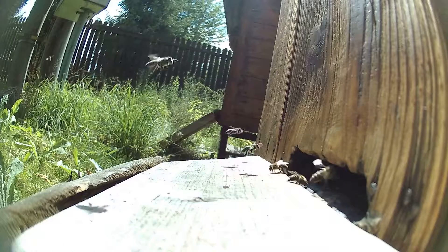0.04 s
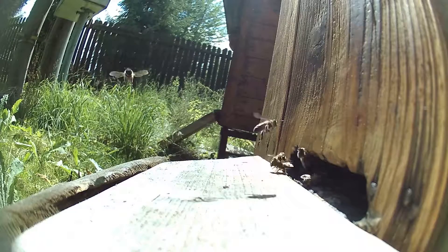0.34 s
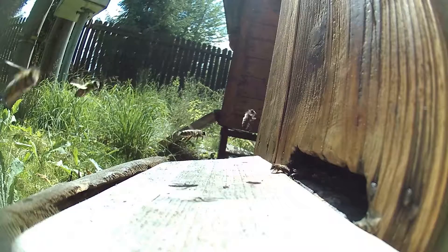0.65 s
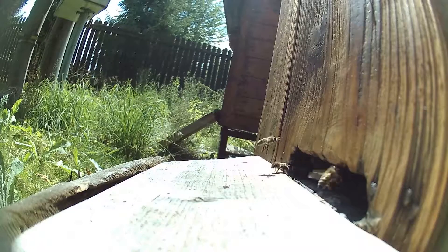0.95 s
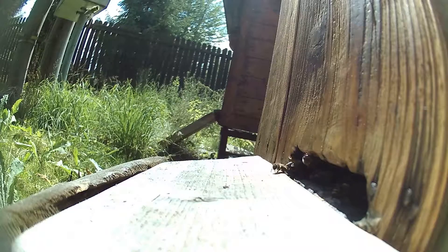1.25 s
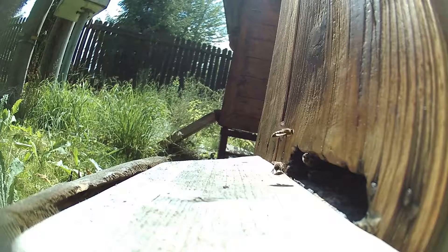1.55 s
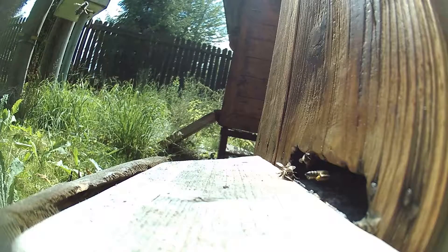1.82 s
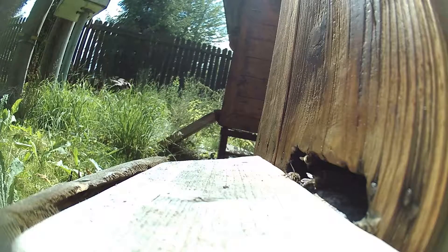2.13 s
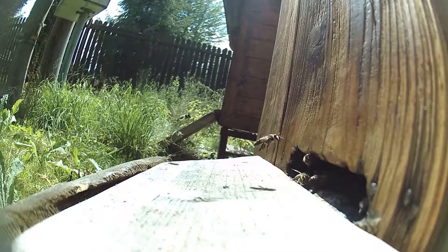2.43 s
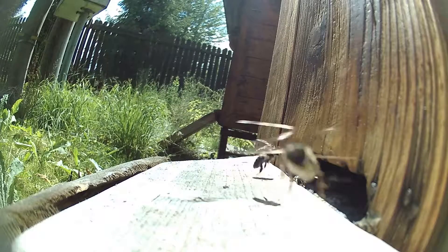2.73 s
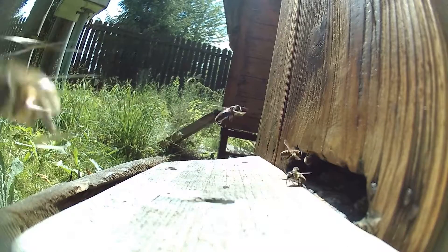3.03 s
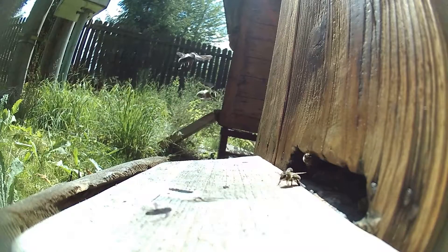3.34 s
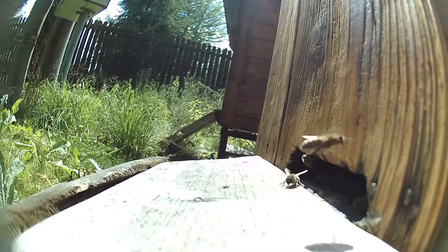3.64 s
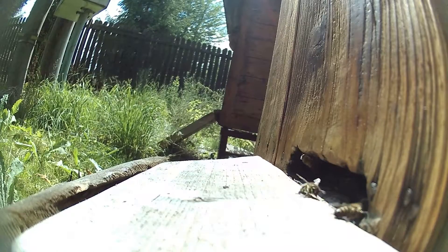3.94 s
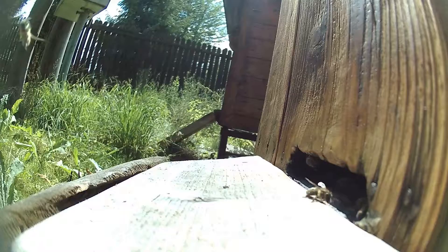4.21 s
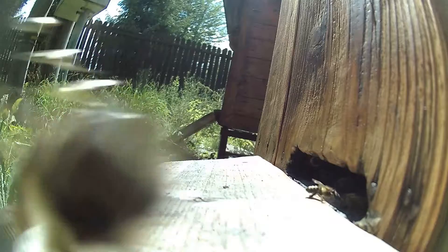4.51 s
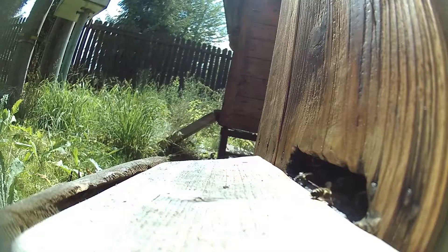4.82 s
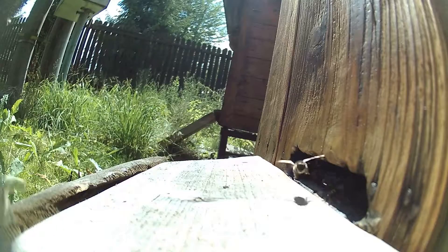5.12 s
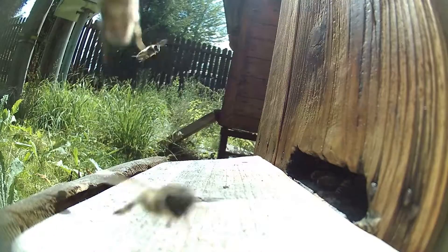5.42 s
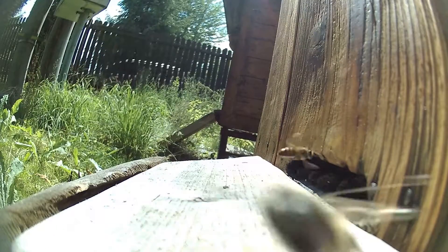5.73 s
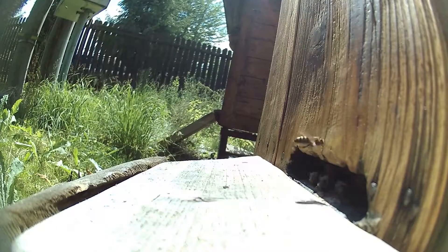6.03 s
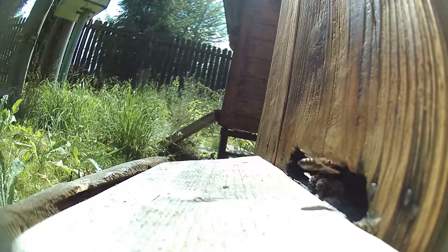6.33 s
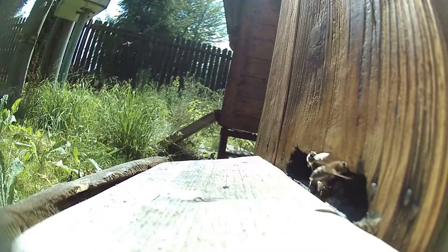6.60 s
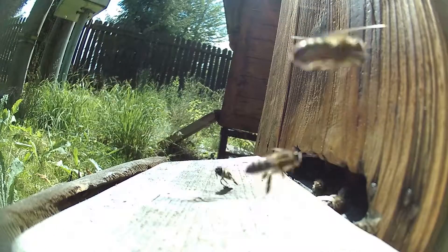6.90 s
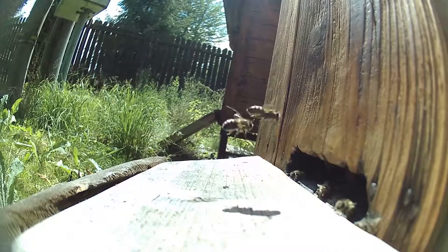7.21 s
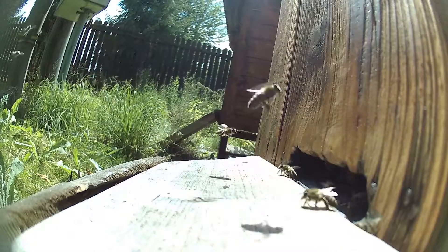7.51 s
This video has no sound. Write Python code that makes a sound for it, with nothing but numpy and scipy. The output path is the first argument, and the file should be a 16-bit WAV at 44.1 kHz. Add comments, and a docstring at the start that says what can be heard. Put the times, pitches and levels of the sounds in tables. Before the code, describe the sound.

A steady buzz of many bees outdoors, with loud close fly-bys and a few sharp taps as they bump the microphone's case.

```python
"""A steady hum of honeybee wings at a garden hive; the microphone is in a small cased camera on the landing board.
Single bees swing close, each wingbeat a snap and a puff of air; the closest blow on the microphone.
Some bump the case or flick it with their wings. The case rings at 1-3 kHz and nearly all sound enters
on the left. Two thin chirps sound above the hum; far off, over the garden's rumble, an engine runs up."""
import sys
import numpy as np
from scipy import signal
from scipy.fft import rfft, irfft
from scipy.io import wavfile
from scipy.ndimage import uniform_filter1d

SR = 44100
rng = np.random.default_rng(int(sys.argv[2]) if len(sys.argv) > 2 else 0)


def unload_audio(sound):
    """Save the sound as a 16-bit wav file, at the path given as the first command line argument."""
    columns = np.transpose(np.atleast_2d(sound))
    # keep every value between -1 and 1, then stretch to whole-number steps
    steps = np.round(np.clip(columns, -1, 1) * 32767)
    wavfile.write(sys.argv[1], SR, steps.astype(np.int16))


N = 337806
TIME = np.arange(N) / SR

# bees passing the microphone: closest t/s, level/dB, approach/s, retreat/s, wingbeat f/Hz,
# glide/(Hz/s), then rasp/dB, low hum/dB and nasal bite/dB relative to the wing snap
FLY_BYS = [(0.679, -51.5, .11, 0.21, 208, 169, 4, -13, -6),
           (0.839, -54, 0.075, 0.19, 207, -60.5, 6, -18, 3),
           (1.85, -60, 0.061, 0.12, 196.7, 78.5, -11, -17, -2),
           (2.18, -60, 0.071, 0.044, 208, 76.5, 0, -20, -2),
           (2.721, -51, 0.061, 0.12, 225.5, -100, 6.5, -15, -9),
           (2.85, -34, 0.032, 0.042, 211, 1.5, -0.5, -7.5, -12),
           (2.92, -40.5, .035, 0.054, 221, -130, -2.5, -4.5, -12),
           (3.029, -49.5, .06, 0.073, 198.8, 2, -9, -13, -14),
           (3.135, -37.5, .05, 0.054, 214.9, 60.5, -5, -7, -10),
           (3.762, -36, .044, 0.052, 225, -60, -3, -8.5, -12),
           (3.825, -38, 0.027, 0.025, 234, 0, 3, -11, -1), (3.874, -35, .03, 0.037, 219, 2, -5, -8, -1),
           (4.02, -49.5, .06, 0.071, 222.5, -21.5, -3, -4.5, 3.5),
           (4.54, -38.5, 0.092, 0.092, 225.8, -45, 0, -7.5, -4.5),
           (5.07, -42, 0.12, 0.14, 210.5, -40.5, -18, -19, -6),
           (5.255, -41.5, 0.09, 0.053, 249, -79.5, -3, -14, 3),
           (5.352, -31.5, .008, .065, 254.6, -150, -4.5, -15, -2.5),
           (5.46, -40.5, .06, 0.1, 239, -30.5, -9, -12.5, 1),
           (5.615, -41.5, .04, 0.18, 219, -89, 0.5, -10.5, -1.5),
           (6.22, -55, 0.053, 0.098, 203.5, -3.5, -11, -2, -15),
           (6.367, -45, 0.041, 0.078, 189.6, -260, -11, -2, -17),
           (6.48, -42.5, 0.049, .07, 182.3, 97.5, -18, -11, -13),
           (6.628, -30.5, .036, .038, 262.3, -200, -10, -6, 2),
           (6.669, -40.5, 0.046, 0.16, 203.8, -130, -4.5, -15.5, -5.5),
           (6.79, -43, .08, 0.067, 246, 99.5, -9, -15, 0),
           (6.931, -47.5, 0.095, 0.17, 179, -20.5, -10, -10, -3),
           (7.10, -45, .04, 0.044, 249.2, -130, 1, -14, 4.5),
           (7.19, -43.5, .1, 0.13, 183.7, -29, -8, -15, -17),
           (7.331, -44, .06, 0.057, 189.3, 38, -8, -7.5, -19),
           (7.47, -54, 0.054, 0.092, 173.2, -32, -11, -5.5, -11)]
# a close bee's wing snap, nasal bite and rasp of air, before the case: f/Hz, level/dB
SNAP_SPECTRUM = [(200, 8), (440, 13.5), (660, -1.5), (1000, 13.5), (1320, 5), (1550, 3), (2200, -2),
                 (3000, -14), (5000, -22.5), (10000, -26)]
BITE_SPECTRUM = [(200, -48), (900, -18.5), (1250, 14), (1460, 6.5), (1650, -27), (3000, -30.5)]
RASP_SPECTRUM = [(200, -0.5), (600, -2), (1400, 4), (2000, -7.5), (3000, -13), (5000, -10.5), (10000, -30)]
# round hum of the wing stroke: multiple of the wingbeat, level/dB
STROKE_HARMONICS = [(1, 0.5), (2, 4.5), (3, -2)]
# bodies bumping the case: t/s, peak/dB, ring f/Hz, rebound relative level/dB, rebound ring f/Hz
BODY_BUMPS = [(2.812, -1, 1960, -4.5, 1910), (3.825, -10, 2640, -5.5, 4100),
              (5.2556, -4.5, 1860, -17, 3500)]
# wing tips on the case: hardest t/s, strikes before, strikes after (both rounded), peak/dB,
# typical ring f/Hz, tick relative level/dB
WING_FLICKS = [(2.8667, 0, -0.5, -20, 2080, -41), (2.9331, 1, 1, -14.5, 2360, -34),
               (3.108, 1, 2, -11, 1950, -25.5), (3.1252, 1, 0, -18.5, 1810, -26),
               (3.8222, 1, 3.5, -23.5, 2300, -45), (4.513, 0, 0.77, -22, 2500, -33),
               (5.3423, 0, 1, -31, 1660, -47)]
# wall modes that every contact rings: f/Hz, width/Hz, level/dB
WALL_MODES = [(2200, 220, -31), (3500, 374, -12), (4230, 1020, -10.5)]
# a contact's tick, ring and scuff, before the case: f/Hz, level/dB
TICK_SPECTRUM = [(1000, -52), (5000, -19.5), (7000, -2.5), (10000, -4.5), (12500, -0.5), (14500, -16),
                 (15500, -15.5)]
RING_SPECTRUM = [(500, 4), (1600, -7.5), (4500, -7.5), (9000, 11)]
SCUFF_SPECTRUM = [(100, 5.5), (1000, -11.5), (3000, 14), (4500, 15.5), (10000, -34), (15000, -45.5)]
# the crowd at the entrance: t/s, level/dB before CROWD_GAIN_DB
CROWD_LEVELS = [(0.0, -46.5), (0.92, -49), (1.26, -52), (2.64, -51), (2.86, -47), (4.35, -47), (4.48, -45),
                (4.88, -45), (5.42, -41), (6.14, -45), (6.78, -45), (7.1, -43.5), (7.36, -49.5),
                (7.66, -49.5)]
# its massed wings, before the case: f/Hz, level/dB
CROWD_SPECTRUM = [(120, -8.5), (190, 2), (260, 7), (390, 0.5), (800, -4.5), (1350, 0.5), (1700, -5),
                  (2100, 0), (2500, -10), (3100, -11), (5000, -14), (10000, -37)]
# wing draughts on the microphone: t/s, half length/s, level/dB
WING_DRAUGHTS = [(2.82, 0.022, -75), (3.78, 0.029, -52.5), (3.887, 0.034, -60), (4.557, .05, -79)]
# their soft rumble, before the case: f/Hz, level/dB
DRAUGHT_SPECTRUM = [(20, -20), (60, -4), (120, -1), (200, -0.5), (500, -24), (1500, -65)]
# thin chirps: t/s, half length/s, level/dB, centre f/Hz, width/Hz
HIGH_CHIRPS = [(0.04, 0.13, -62.5, 4150, 452), (6.282, 0.012, -39, 2980, 200)]
# the far machine swelling and receding: t/s, relative level/dB
MACHINE_SWELL = [(0, -35), (3.2, -17), (3.95, -8), (5.8, -1), (6.75, 2.5), (7.15, -10.5), (7.66, -9.5)]
# its engine's strongest lines: multiple of the cycle rate, level/dB
ENGINE_LINES = [(3, -14.5), (4, -14.5), (16, -16.5), (18, -4.5), (20, 5), (22, -7), (24, -10.5), (26, -19),
                (28, -16.5)]
# machine whirr, garden rumble and microphone hiss, before the case: f/Hz, level/dB
WHIRR_SPECTRUM = [(200, -10.5), (600, 5), (1000, -2.5), (1400, -14.5), (2200, -20.5), (2650, -2.5),
                  (3050, -0.5), (3300, -15.5), (4500, -24), (10000, -30.5)]
GARDEN_SPECTRUM = [(20, -18.5), (42, -10), (85, 2), (130, -1.5), (300, -9), (800, -23), (3000, -45)]
HISS_SPECTRUM = [(20, 5.5), (1000, -4.5), (5000, 3.5), (12000, 0), (15500, -6)]
# what the case passes to the microphone, with a dead band above its resonances: f/Hz, level/dB
CASE_RESPONSE = [(150, -33), (500, -18.5), (1000, -12), (1320, -3), (1620, -1.5), (2030, -4), (2420, -4),
                 (2900, -4.5), (3500, -12.5), (5000, -27.5), (6000, -49.5), (6900, -39), (8200, -48.5),
                 (9700, -27.5), (13000, -25)]

FALL_DB, LOST_AT = 44, 3.3  # fall per tenfold distance; distance at which the crowd hides a bee
SAG_SHARE = .06  # the wings slow away from the case
PITCH_WAVER, PITCH_TURNS_PER_S = .008, 18
REBOUND_S, BUMP_WIDTH_HZ, BUMP_TICK_DB = .0016, 420, -49
FLICK_RATE_HZ, FLICK_WIDTH_HZ, FLICK_FADE_DB = 225.2, 1140, 3.5  # fade per strike from the hardest
IDLE_HZ, RUN_HZ = 30.82, 36.6  # engine cycle rates
RUN_UP_MIDDLE_S, RUN_UP_S, RUN_UP_DB = 3.6, .62, 21
ENGINE_DB, WHIRR_DB, ENGINE_SWELL_SHARE = -55.5, -45.5, .41  # the engine swells less than the whirr
CROWD_GAIN_DB, GARDEN_DB, HISS_DB, RIGHT_DB, TOP_HZ = 4.5, -66, -58, -53, 15550


def near_bee(closest_s, level_db, approach_s, retreat_s, wingbeat_hz, glide_hz_per_s,
             rasp_db, hum_db, bite_db, flutter=.005, uneven_db=1.2, puff_focus=1.3, near_field=.4):
    """Close on the microphone: each wingbeat snaps and sheds a puff of air; the stroke itself hums."""
    since = TIME - closest_s
    # a straight path; distance is 1 at the closest point
    distance = np.hypot(1, since / np.where(since < 0, approach_s, retreat_s))
    heard = distance < LOST_AT
    t, distance = since[heard], distance[heard]
    distance_db = -FALL_DB * np.log10(distance)
    hz = (wingbeat_hz + glide_hz_per_s * t) * (1 - SAG_SHARE * (1 - 1 / distance))
    waver = 1 + flutter * walk(89.15, N)[heard] + PITCH_WAVER * walk(PITCH_TURNS_PER_S, N)[heard]
    phase = np.cumsum(hz * waver) / SR
    angle = 2 * np.pi * phase
    strokes = beats(phase) * undb(uneven_db * walk(150, N)[heard])
    snap = through_case(strokes, SNAP_SPECTRUM) + undb(bite_db) * through_case(strokes, BITE_SPECTRUM)
    puffs = rng.standard_normal(N)[heard] * np.exp(puff_focus * np.cos(angle))
    rasp = through_case(puffs, RASP_SPECTRUM)
    hum = unit(sum(undb(db) * np.cos(round(k) * angle) for k, db in STROKE_HARMONICS))
    hum *= undb(near_field * distance_db)  # near-field air motion falls off faster than the buzz
    fade = np.minimum(LOST_AT - distance, 1)
    out = np.zeros(N)
    out[heard] = (snap + undb(rasp_db) * rasp + undb(hum_db) * hum) * undb(level_db + distance_db) * fade
    return out


def contacts(ring_spread=.36):
    """A body lands and rebounds, a wing strikes once a beat: t/s, peak/dB, f/Hz, width/Hz, tick/dB."""
    for s, db, hz, rebound_db, rebound_hz in BODY_BUMPS:
        yield s, db, hz, BUMP_WIDTH_HZ, BUMP_TICK_DB
        yield s + REBOUND_S, db + rebound_db, rebound_hz, BUMP_WIDTH_HZ, BUMP_TICK_DB
    for s, before, after, db, hz, tick_db in WING_FLICKS:
        for k in range(-round(before), round(after) + 1):
            ring_hz = hz * np.exp(ring_spread * rng.standard_normal())
            yield s + k / FLICK_RATE_HZ, db - abs(k) * FLICK_FADE_DB, ring_hz, FLICK_WIDTH_HZ, tick_db


def case_taps(size=2048, scuff_db=-15, scuff_s=.0026, contact_s=.00028):
    """Right on the case: each contact ticks, rings the wall and scuffs along it for a few milliseconds."""
    out, t = np.zeros(N + size), np.arange(size) / SR
    tick = through_case(1. * (t == 0), TICK_SPECTRUM)
    press = 1 - np.exp(-t / contact_s)  # a soft body takes a moment to press home
    wall = sum(undb(db) * damped(t, hz, width_hz) for hz, width_hz, db in WALL_MODES)
    for s, db, hz, width_hz, tick_db in contacts():
        ring = through_case(press * (damped(t, hz, width_hz) + wall), RING_SPECTRUM)
        scuff = through_case(rng.standard_normal(size) * np.exp(-t / scuff_s), SCUFF_SPECTRUM)
        tap = ring + undb(scuff_db) * scuff + undb(tick_db) * tick
        at = int((s - contact_s) * SR)
        out[at:at + size] += undb(db) * tap / np.abs(tap).max()
    return out[:N]


def crowd(count=14, wingbeat_hz=205, spread=.085, flutter=.012, roam_db=3, air_db=-5):
    """Further off, at the entrance: bees drift in wingbeat and distance over the rush of their wings."""
    clicks = np.zeros(N)
    for _ in range(count):
        hz = wingbeat_hz * np.exp(spread * walk(rng.uniform(2, 5), N) + flutter * walk(40, N))
        clicks += beats(rng.random() + np.cumsum(hz) / SR) * undb(roam_db * walk(4, N))
    # the crowd as a whole stays steady while its members come and go
    clicks /= np.sqrt(uniform_filter1d(clicks ** 2, SR // 4) + 1e-12)
    wings = clicks + undb(air_db) * rng.standard_normal(N)
    return through_case(wings, CROWD_SPECTRUM) * undb(level_curve(CROWD_LEVELS) + CROWD_GAIN_DB)


def camera_sway(start_s=2.813, gain_db=-47):
    """The hardest bump rocks the camera on the board: one slow, quickly damped sway."""
    return undb(gain_db) * damped(np.maximum(TIME - start_s, 0), hz=30, width_hz=26)


def draughts():
    """The closest wings blow softly on the microphone."""
    gusts = sum(undb(db) * swell(s, half_s) for s, half_s, db in WING_DRAUGHTS)
    return gusts * through_case(rng.standard_normal(N), DRAUGHT_SPECTRUM)


def chirps():
    """Thin chirps above the hum, each a short swell of narrow-band noise."""
    out = np.zeros(N)
    for s, half_s, db, hz, width_hz in HIGH_CHIRPS:
        band = signal.butter(2, [hz - width_hz / 2, hz + width_hz / 2], "bandpass", fs=SR, output="sos")
        out += unit(signal.sosfilt(band, rng.standard_normal(N))) * undb(db) * swell(s, half_s)
    return out


def far_machine(line_waver_db=6.5, whirr_waver_db=2.2, speed_waver=.008):
    """Far away, an engine runs up from idle and grows louder; its lines and whirr waver in the air."""
    swell_db = level_curve(MACHINE_SWELL)
    revs = (1 + np.tanh((TIME - RUN_UP_MIDDLE_S) / RUN_UP_S)) / 2
    hz = IDLE_HZ + (RUN_HZ - IDLE_HZ) * revs
    angle = 2 * np.pi * np.cumsum(hz * (1 + speed_waver * walk(25, N))) / SR
    lines = sum(undb(db + line_waver_db * walk(12, N)) * np.sin(round(k) * angle)
                for k, db in ENGINE_LINES)
    engine = unit(lines) * undb(ENGINE_DB + RUN_UP_DB * (revs - 1) + ENGINE_SWELL_SHARE * swell_db)
    whirr = through_case(rng.standard_normal(N), WHIRR_SPECTRUM)
    return engine + whirr * undb(WHIRR_DB + swell_db + whirr_waver_db * walk(16, N))


def garden_rumble():
    """Low outdoor rumble behind everything."""
    return undb(GARDEN_DB) * through_case(rng.standard_normal(N), GARDEN_SPECTRUM)


def through_case(x, spectrum, size=2048):
    """Give x a source spectrum and the ringing of the case around the microphone; rms 1."""
    log_hz = np.log(np.arange(size // 2 + 1) * SR / size + 1)
    shapes = np.transpose(spectrum), np.transpose(CASE_RESPONSE)
    db = sum(np.interp(log_hz, np.log(hz), levels) for hz, levels in shapes)
    # minimum phase: the ringing follows its cause
    cepstrum = irfft(np.log(undb(db)))
    cepstrum[1:size // 2] *= 2
    cepstrum[size // 2 + 1:] = 0
    ringing = irfft(np.exp(rfft(cepstrum)))
    return unit(signal.fftconvolve(x, ringing)[:len(x)])


def beats(phase):
    """One click at each whole turn of the phase, shared between two samples."""
    at = np.flatnonzero(np.diff(np.floor(phase)))
    late = phase[at + 1] % 1 / (phase[at + 1] - phase[at])
    clicks = np.zeros(len(phase))
    clicks[at], clicks[at + 1] = late, 1 - late
    return clicks


def damped(t, hz, width_hz):
    """The free ring of one resonance."""
    return np.exp(-np.pi * width_hz * t) * np.sin(2 * np.pi * hz * t)


def swell(s, half_s):
    """A smooth swell around the time s."""
    return np.exp(-((TIME - s) / half_s) ** 2)


def walk(rate, size):
    """Smooth random drift with about `rate` turns a second and a spread near 1."""
    hold = max(int(SR / rate), 2)
    steps = np.repeat(rng.standard_normal(size // hold + 1), hold)
    return 1.2 * uniform_filter1d(steps, hold)[:size]


def level_curve(rows):
    """Join rows of t/s, level/dB with straight lines."""
    return np.interp(TIME, *np.transpose(rows))


def undb(db):
    """Decibels to gain."""
    return 10 ** (np.asarray(db) / 20)


def unit(x):
    """Scale to rms 1."""
    return x / np.sqrt(np.mean(x ** 2))


def scene():
    """The hive and garden from the landing board; the right channel is almost deaf."""
    bees = sum(near_bee(*bee) for bee in FLY_BYS) + crowd()
    sound = bees + case_taps() + camera_sway() + draughts() + chirps() + far_machine() + garden_rumble()
    return np.array([sound, undb(RIGHT_DB) * sound])


def record(dry):
    """The camera adds its own faint hiss to each channel and cuts the top."""
    hiss = np.array([through_case(rng.standard_normal(N), HISS_SPECTRUM) for _ in dry])
    top_cut = signal.ellip(10, .2, 70, TOP_HZ, fs=SR, output="sos")
    return signal.sosfilt(top_cut, dry + undb(HISS_DB) * hiss)


dry = scene()
out = record(dry)
unload_audio(out)
```